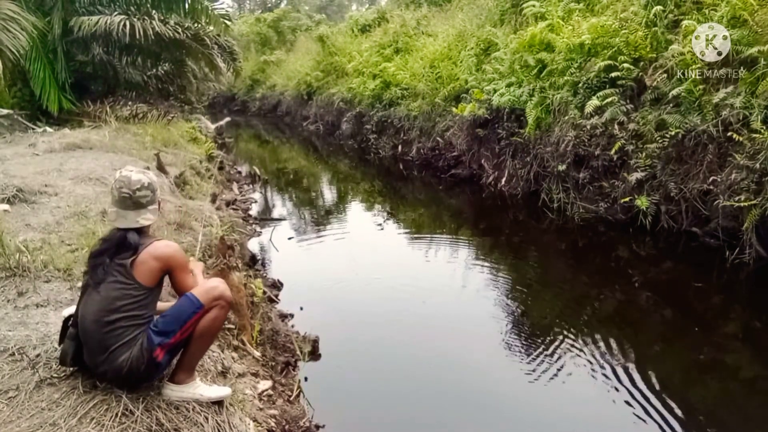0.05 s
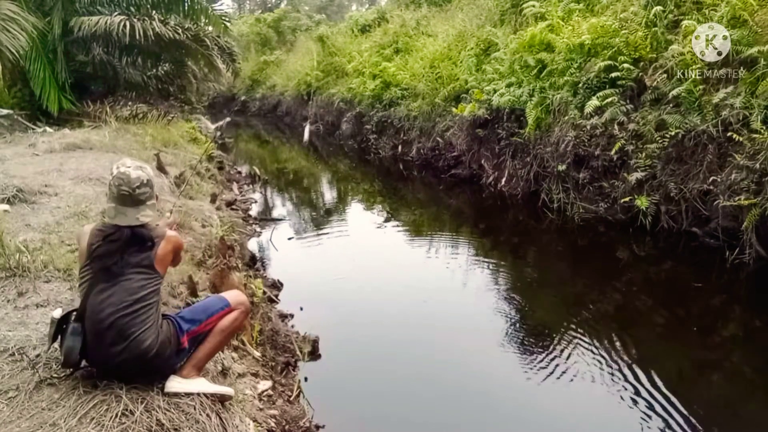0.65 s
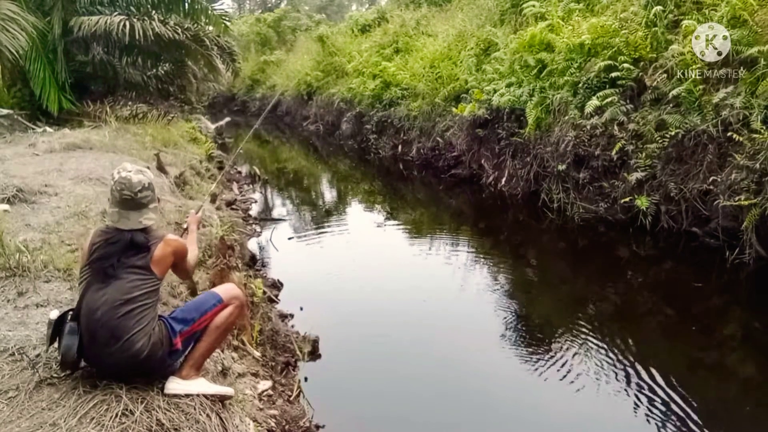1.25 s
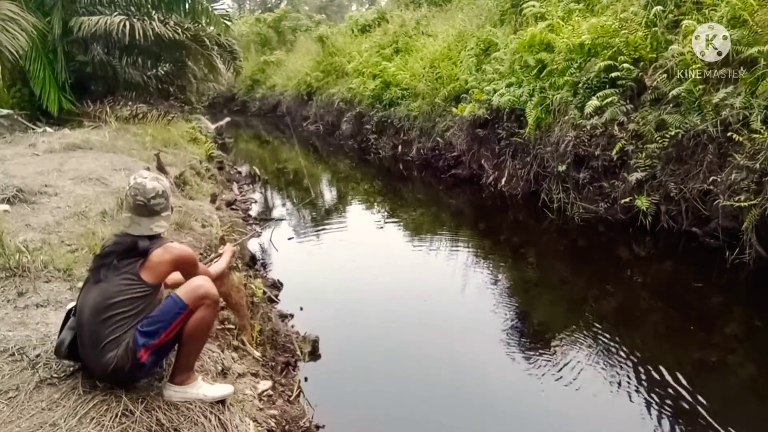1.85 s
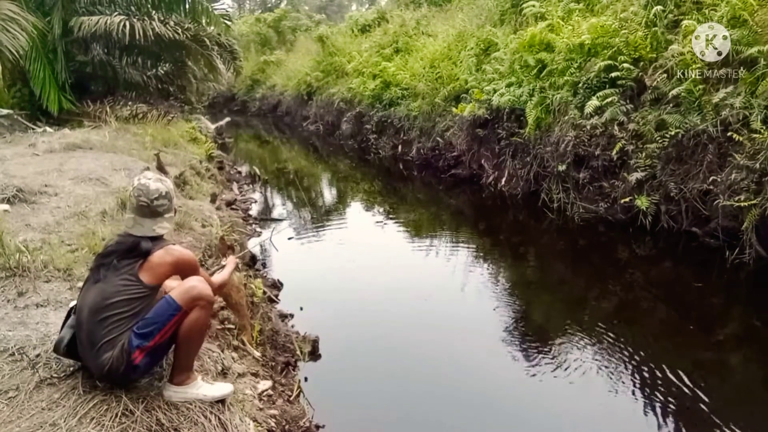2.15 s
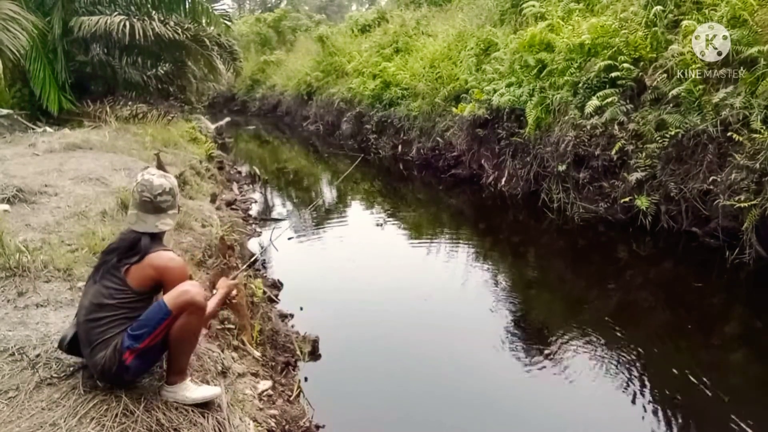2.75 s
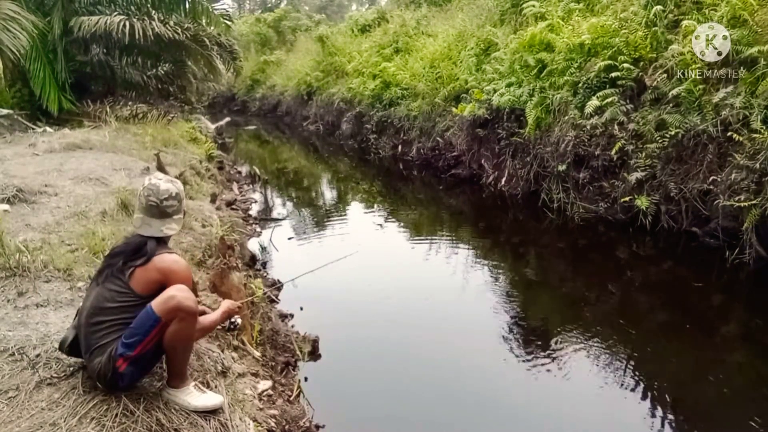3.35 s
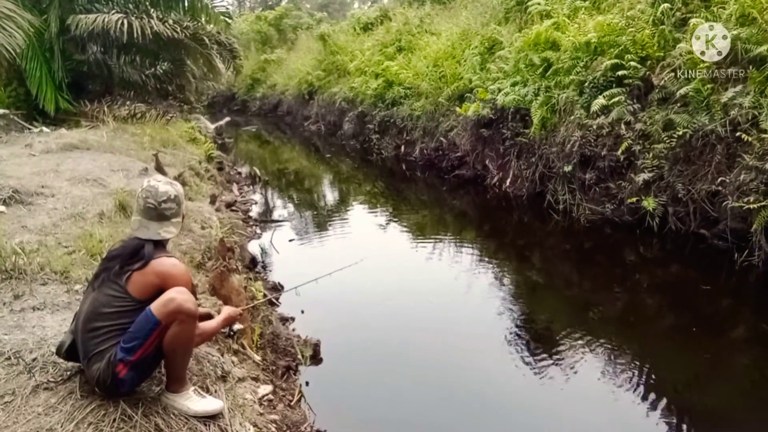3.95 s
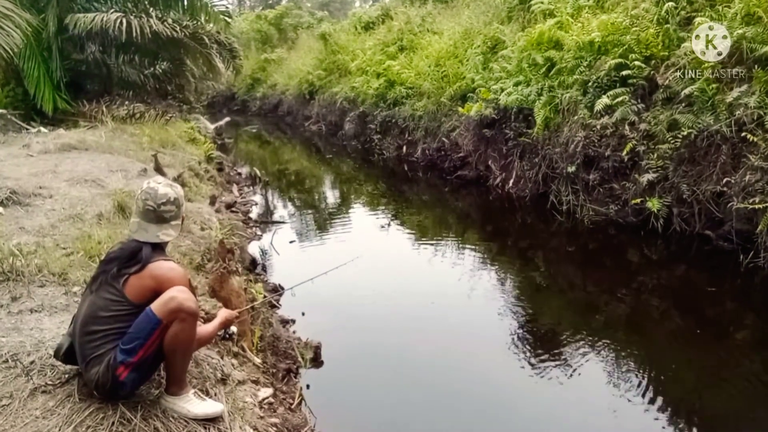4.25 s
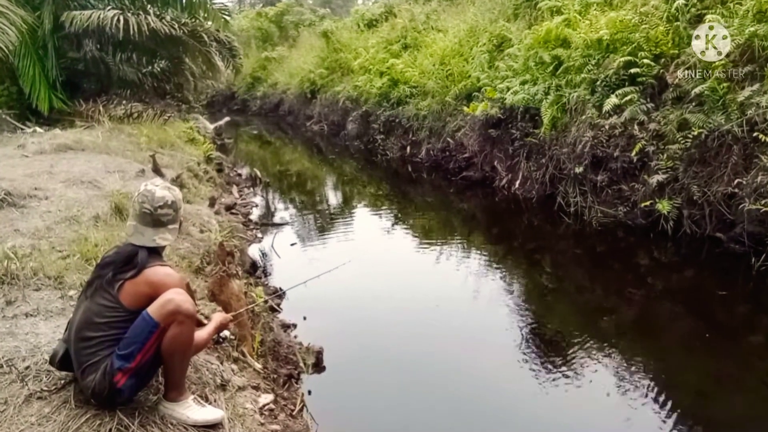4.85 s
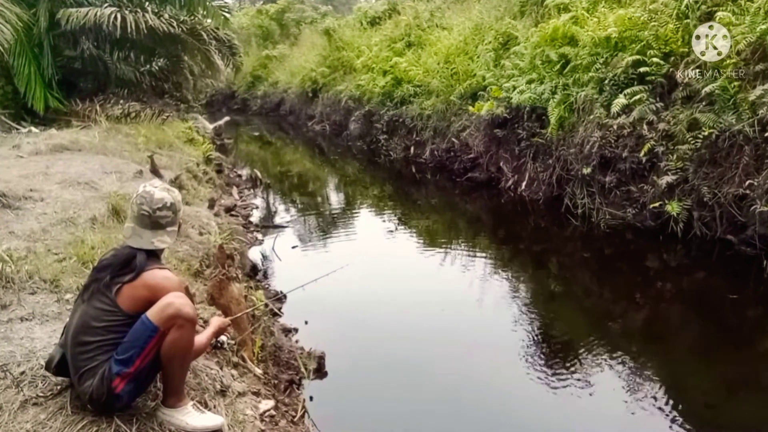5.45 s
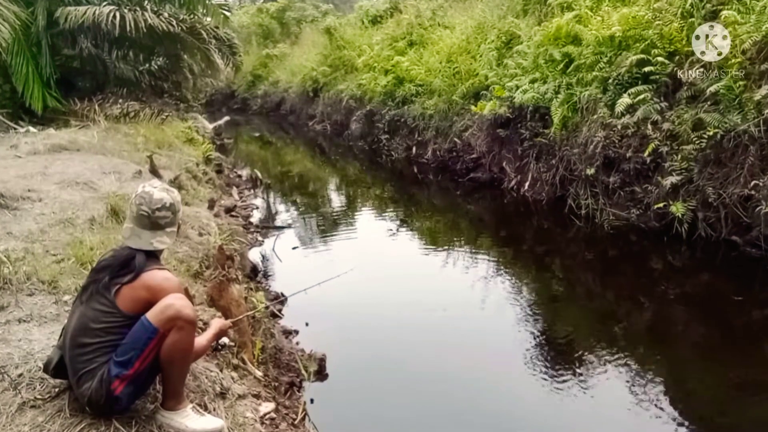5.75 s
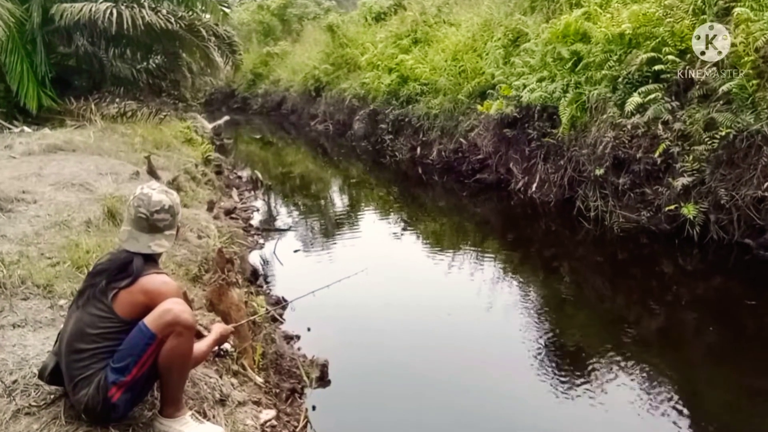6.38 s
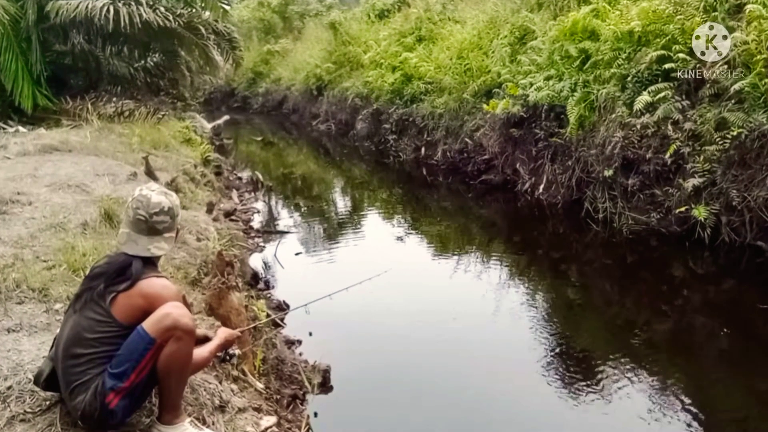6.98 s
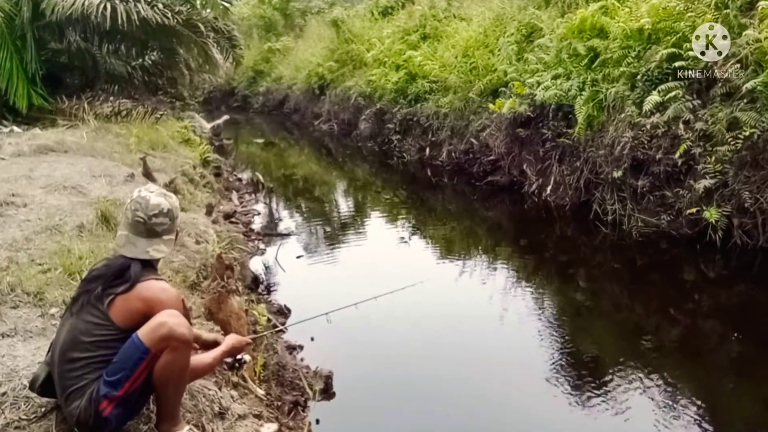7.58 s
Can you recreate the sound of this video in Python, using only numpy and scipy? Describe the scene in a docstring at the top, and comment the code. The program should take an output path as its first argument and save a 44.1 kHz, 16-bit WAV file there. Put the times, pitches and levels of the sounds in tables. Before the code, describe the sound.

Crickets and a chirping bird outdoors, with one sharp rod swish, hissing line, reel clicks and faint distant hooting.

```python
"""Crickets pulse in open air while birds call faintly and one small bird repeats a high arched note.
An angler draws line and casts: the rod swishes at 0.7 s and line hisses off the reel.
The line ticks on the guides, the bail clacks shut at 2.3 s and slack is wound in.
A faint drone sets in, then a rough two-tone hooting comes from far off until 5.6 s.
The crickets and birds carry on, with a few soft low bumps near the end."""
import sys
import numpy as np
from scipy import signal
from scipy.fft import rfft, irfft, next_fast_len
from scipy.io import wavfile
from scipy.ndimage import uniform_filter1d

SR = 44100
rng = np.random.default_rng(int(sys.argv[2]) if len(sys.argv) > 2 else 0)


def materialize(psi):
    """Save the field psi as 16-bit PCM at rate SR to the path in sys.argv[1].

    A 1-D psi becomes a single channel; in a 2-D psi each row is a channel.
    """
    bounded = np.clip(np.atleast_2d(psi).T, -1, 1)
    quanta = np.round(bounded * 32767).astype(np.int16)
    wavfile.write(sys.argv[1], SR, quanta)


N = 336042
TIME = np.arange(N) / SR


def amp(db):
    """Decibels to gain."""
    return 10 ** (np.asarray(db) / 20)


def unit(x):
    """Scale to rms 1."""
    return x / np.sqrt(np.mean(abs(x) ** 2) + 1e-20)


def add(mix, s, sound):
    """Mix a sound in at s seconds."""
    part = mix[max(round(s * SR), 0):][:len(sound)]
    part += sound[:len(part)]


def envelope(s, hold_s, attack_s, release_s):
    """Gain 1 from s for hold_s; 20 dB of rise per attack_s before, 20 dB of fall per release_s after."""
    outside = np.maximum((s - TIME) / attack_s, (TIME - s - hold_s) / release_s)
    return amp(-20 * np.clip(outside, 0, 10))


def noise():
    """White noise, rms 1."""
    return rng.standard_normal(N)


def drift(hz):
    """Random wander, rms 1, with a bandwidth of about hz."""
    t = np.linspace(0, N / SR, 8192)
    lowpass = np.exp(-.5 * (np.fft.rfftfreq(len(t), t[1]) / hz) ** 2)
    return np.interp(TIME, t, unit(irfft(rfft(rng.standard_normal(len(t))) * lowpass)))


def grains(per_s, spread_db):
    """Dense tiny impacts of uneven size."""
    size = amp(spread_db * np.minimum(rng.exponential(1, N), 4))
    return unit(noise() * size * (rng.random(N) < per_s / SR))


def fuzzy_tone(hz, width_hz, rough, wander_hz=9):
    """Tone with the share `rough` of its power scattered into a narrow band."""
    phase = 2 * np.pi * np.cumsum(hz + wander_hz * drift(5.97)) / SR
    steady, scattered = np.sqrt(1 - rough), np.sqrt(rough / 2)
    in_phase = (steady + scattered * drift(width_hz)) * np.cos(phase)
    return unit(in_phase + scattered * drift(width_hz) * np.sin(phase))


def patchy(x, depth_db):
    """Narrow bands swell and fade for a few tens of milliseconds each."""
    bands = signal.stft(x, nperseg=512)[2]
    field = rng.standard_normal(bands.shape)
    for _ in range(2):
        field = uniform_filter1d(uniform_filter1d(field, size=3, axis=0), size=6, axis=1)
    return unit(signal.istft(bands * amp(depth_db * unit(field)), nperseg=512)[1][:N])


def response_db(freqs, spectrum, skirt_db_per_oct):
    """Interpolate a (Hz, dB) spectrum over octaves, rolling off beyond its ends."""
    hz, db = np.transpose(spectrum)
    octave, known = np.log2(freqs + 1), np.log2(hz)
    beyond = abs(octave - np.clip(octave, known[0], known[-1]))
    return np.interp(octave, known, db) - skirt_db_per_oct * beyond


def colour(x, spectrum):
    """Zero-phase filter; output rms 1."""
    size = next_fast_len(N, True)
    gain = amp(response_db(np.fft.rfftfreq(size, 1 / SR), spectrum, skirt_db_per_oct=42))
    return unit(irfft(rfft(x, size) * gain, size)[:N])


def ring(x, spectrum):
    """Strike a minimum-phase body with x."""
    db = response_db(abs(np.fft.fftfreq(4096, 1 / SR)), spectrum, skirt_db_per_oct=24)
    log_gain = np.log(amp(np.maximum(db, -70)))
    body = np.fft.ifft(np.exp(np.conj(signal.hilbert(log_gain)))).real
    return signal.oaconvolve(x, body / np.linalg.norm(body))[:N]


def echo(x, db, t60_s):
    """Sparse, fading reflections, without the direct sound."""
    t = np.arange(SR) / SR
    taps = rng.standard_normal(SR) * (rng.random(SR) < .1) * (t > .003) * amp(-60 * t / t60_s)
    return amp(db) * signal.fftconvolve(x, taps / np.linalg.norm(taps))[:N]


# open air (frequency [Hz], level [dB])
AIR_SPECTRUM = [(20, -17), (60, -3.5), (120, 2.5), (260, -1), (440, -0.5), (660, -3.5), (1000, -8),
                (1350, 4), (2100, -10.5), (3200, -8), (4100, -15), (5600, -6.5), (11000, -21.5),
                (15500, -14.5)]


def air():
    """A faint wash from the open land."""
    return amp(-67) * colour(patchy(noise(), depth_db=2.5), AIR_SPECTRUM)


# far insects (frequency [Hz], level [dB])
CHORUS_SPECTRUM = [(6650, -62), (6970, -6.5), (7350, -1.5), (7900, -3.5), (8380, -2.5), (8480, -9),
                   (9200, -5.5), (10000, -9.5), (10550, -17), (10700, -25)]
# chorus loudness (time [s], level [dB])
CHORUS_CURVE = [(0, -59), (2.1, -59), (3.3, -62), (4.5, -62.5), (5.5, -63.5), (6.5, -62.5), (7.6, -61)]


def insect_chorus(flutter_db=.4):
    """Far crickets blend into a hiss."""
    hiss = colour(patchy(noise(), depth_db=.5), CHORUS_SPECTRUM)
    return hiss * amp(np.interp(TIME, *np.transpose(CHORUS_CURVE)) + flutter_db * drift(40))


# near crickets (pitch [Hz], pulse rate [Hz], time of one pulse [s], level [dB], depth [0-1], width [Hz])
CRICKET_TONES = [(8105, 16.8, 4.703, -65.5, .9, 16), (8355, 16.8, 4.71, -73, .6, 30),
                 (7815, 17.1, 5.03, -67, .55, 24), (7970, 21.5, 5.24, -72, .6, 24),
                 (7010, 24, 4.8, -68, .55, 60)]
# neighbouring cricket's bouts (time [s], length [s])
CRICKET_BOUTS = [(3.63, 0.48), (4.276, 0.35), (4.935, 0.31), (5.655, 0.26), (6.273, 0.22)]


def crickets(fade_db_per_s=.45, rest_db=-19, bout_db=2.5, lift_hz=30, swell_db=1):
    """Pulsing tones that lift in pitch on each pulse; the nearest eases off, its neighbour has bouts."""
    nearest_db = 1.2 - fade_db_per_s * TIME
    singing = np.max([envelope(s, length, .057, .057) for s, length in CRICKET_BOUTS], axis=0)
    neighbour_db = rest_db + (bout_db - rest_db) * singing
    efforts_db = [nearest_db, nearest_db, neighbour_db, 0, 0]  # the nearest rings on two pitches
    out = np.zeros(N)
    for (hz, pulse_hz, s, db, depth, width_hz), effort_db in zip(CRICKET_TONES, efforts_db):
        cycle = 2 * np.pi * pulse_hz * (TIME - s)
        stroke = (.5 + .5 * np.cos(cycle)) ** 3
        pulsing = unit(1 + depth * (stroke - 1))
        tone = fuzzy_tone(hz + lift_hz * np.sin(cycle), width_hz, rough=.4)
        out += amp(db + effort_db + swell_db * drift(.38)) * pulsing * tone
    return out


# bird calls (time [s], length [s], start pitch [Hz], middle pitch [Hz], end pitch [Hz], level [dB])
BUSH_CALLS = [(0.005, 0.027, 1415, 1488, 1420, -61), (0.902, 0.035, 1464, 1944, 1450, -49.5),
              (0.903, 0.052, 1602, 1633, 1660, -50), (1.031, .04, 1600, 1500, 1460, -62.5),
              (1.19, 0.042, 1745, 1992, 1860, -50.5), (1.23, 0.025, 1460, 1635, 1600, -50.5),
              (2.723, 0.024, 1140, 1116, 1090, -56.5), (2.796, 0.033, 1710, 1550, 1380, -60),
              (3.555, 0.013, 1180, 1140, 1040, -63), (3.608, 0.012, 2410, 2570, 2600, -69),
              (4.57, 0.0066, 3180, 3210, 2480, -53.5), (4.791, 0.019, 3400, 3223, 3050, -67.5),
              (4.914, 0.016, 3360, 3230, 3140, -69), (5.166, 0.04, 6290, 6500, 6440, -67),
              (5.168, 0.019, 5170, 5290, 4800, -61), (5.7, 0.019, 1250, 1290, 1290, -65.5),
              (6.263, 0.032, 1930, 1835, 1590, -64), (6.311, 0.074, 1695, 1643, 1640, -74),
              (7.021, 0.007, 4100, 3260, 2660, -58), (7.51, 0.02, 3200, 3070, 3100, -70),
              (7.557, 0.02, 3470, 3670, 3720, -70)]


def bush_birds(waver=.029):
    """Short, slightly hoarse whistles from deep in the bushes."""
    out, wobble = np.zeros(N), 1 + waver * drift(185)
    for s, length, *pitches_hz, db in BUSH_CALLS:
        u = np.linspace(-1, 1, int(length * SR))
        hz = np.polyval(np.polyfit([-1, 0, 1], pitches_hz, 2), u)
        hz *= np.interp(s + length * (u + 1) / 2, TIME, wobble)
        note = signal.windows.tukey(len(u), .6) * np.sin(2 * np.pi * np.cumsum(hz) / SR)
        add(out, s, amp(db) * unit(note))
    return out + echo(out, db=-2, t60_s=.14) + echo(out, db=-11, t60_s=.4)


def far_twitter(per_s=14, softest_db=-78):
    """Distant falling peeps, blurred by the bushes."""
    out = np.zeros(N)
    for when, pitch, glide, size, length in rng.random((int(per_s * N / SR), 5)):
        u = np.linspace(-1, 1, int((.005 + .01 * length) * SR))
        hz = (2600 + 1300 * pitch) * (1 - .25 * glide * u)
        peep = np.hanning(len(u)) * np.sin(2 * np.pi * np.cumsum(hz) / SR)
        add(out, when * N / SR, amp(softest_db) * (1 + size) * unit(peep))
    return echo(out, db=0, t60_s=.25)


# hand draws line or turns the reel (time [s], length [s], rub [dB], fizz [dB], rattle [dB])
HAND_STROKES = [(0.03, 0.12, -60.5, -75, -99), (0.2, 0.21, -55.5, -69, -72),
                (0.466, 0.085, -63.5, -74, -63.5), (1.65, 0.062, -63, -82, -77),
                (1.833, 0.048, -68, -70, -84), (2.296, 0.024, -51, -68, -68), (2.39, 0.15, -57, -70, -73.5),
                (2.6, 0.048, -49, -61, -81), (2.708, 0.047, -53, -74, -56.5),
                (2.797, 0.052, -49.5, -61, -77), (2.912, 0.16, -58.5, -76, -73.5),
                (3.127, 0.13, -63.5, -83, -92)]
# line let go, then stopped by the bail (time [s], level [dB])
LINE_JERKS = [(.722, -40), (2.282, -52)]
# line over the spool lip (frequency [Hz], level [dB])
FIZZ_SPECTRUM = [(10000, -10), (11200, -3), (11800, -14), (13000, -2), (14000, 1), (14700, 14),
                 (15500, 7.5)]
# taut line exciting the rod's resonances (frequency [Hz], level [dB])
SCRAPE_SPECTRUM = [(2700, -26), (3200, -5), (4200, -14), (5050, 4.5), (5350, 7), (5750, 7), (6300, 2.5)]
# line through the guides (frequency [Hz], level [dB])
RUB_SPECTRUM = [(90, -14), (250, -13), (450, -22), (1500, -10), (2200, -24.5), (3200, -16.5), (4300, -25),
                (5200, -10.5), (6100, -6), (7000, 4.5), (8000, -2), (9500, -9.5), (11000, -18.5),
                (13000, -60)]
# reel turning in its housing (frequency [Hz], level [dB])
RATTLE_SPECTRUM = [(180, -24), (250, 19), (400, -51), (800, -9), (1150, -10), (1550, 9), (2100, -12.5),
                   (2800, 4.5), (3500, 10.5), (4300, -6)]


def fishing_line(let_go_s=.72, flight_s=.615, flight_db=-51, growth_db_per_s=8):
    """Hand strokes rub the line and rattle the reel; in flight the line hisses off the spool."""
    gates = [envelope(s, length, attack_s=.05, release_s=.095) for s, length, *_ in HAND_STROKES]
    hand_rub, hand_fizz, hand_rattle = amp(np.transpose(HAND_STROKES)[2:]) @ gates
    jerks = sum(amp(db) * envelope(s, .004, attack_s=.006, release_s=.04) for s, db in LINE_JERKS)
    fizz_db = flight_db + growth_db_per_s * np.clip(TIME - let_go_s, 0, flight_s)
    flight_fizz = amp(fizz_db) * envelope(let_go_s, flight_s, attack_s=.025, release_s=.18)
    flight_rub = amp(flight_db) * envelope(let_go_s, flight_s, attack_s=.26, release_s=.66)
    fizz = amp(.3 * drift(40)) * colour(patchy(noise(), depth_db=4), FIZZ_SPECTRUM)
    scrape = amp(-8) * colour(patchy(noise(), depth_db=4.5), SCRAPE_SPECTRUM)
    rub = colour(patchy(grains(per_s=5900, spread_db=0), depth_db=2), RUB_SPECTRUM)
    rattle = colour(patchy(grains(per_s=1500, spread_db=1.5), depth_db=10), RATTLE_SPECTRUM)
    return ((hand_fizz + jerks + flight_fizz) * fizz + hand_rub * scrape
            + (hand_rub + flight_rub) * rub + hand_rattle * rattle)


# arched notes (time of top [s], top pitch [Hz], level [dB], rise [s], fall [s])
ARCHED_NOTES = [(0.263, 4910, -56, 0.039, 0.042), (1.476, 4765, -48.5, 0.037, 0.024),
                (1.967, 4674, -54.5, 0.07, 0.017), (2.418, 4920, -51.5, 0.062, 0.044),
                (2.878, 4597, -51.5, 0.054, 0.051), (3.365, 5030, -48, 0.05, 0.04),
                (3.856, 4764, -52.5, 0.057, 0.045), (4.318, 4782, -50, .058, 0.052),
                (5.697, 4820, -59, 0.05, 0.015), (6.093, 4750, -59.5, 0.056, 0.046),
                (6.523, 5130, -47.5, 0.046, 0.033), (6.928, 4650, -54.5, 0.051, 0.026),
                (7.338, 5080, -42.5, 0.044, 0.048)]


def small_bird(climb=.235, drop=.3, drop_s=.045, corner=.417, ends_db=-29, waver=.012, bank_s=.085):
    """A pure whistle slides up, rounds a corner and falls; its loud top lingers among the trees."""
    direct, tops, wobble = np.zeros(N), np.zeros(N), 1 + waver * drift(140)
    for s, top_hz, db, rise, fall in ARCHED_NOTES:
        t = np.arange(-rise, fall, 1 / SR)
        u = np.where(t < 0, t / rise, [t / fall, t / drop_s])  # pitch drops at one pace in all notes
        fade, bend = (np.hypot(u, corner) - corner) / (np.hypot(1, corner) - corner)
        hz = top_hz * (1 - np.where(t < 0, climb, drop) * bend) * np.interp(s + t, TIME, wobble)
        gain = amp(db + ends_db * fade ** 1.62) * signal.windows.tukey(len(t), .12)
        note = np.sqrt(2) * gain * np.sin(2 * np.pi * np.cumsum(hz) / SR)
        add(direct, s - rise, note)
        add(tops, s - rise, note * amp(-22 * bend))
    leaves = echo(direct, db=-1, t60_s=.16)
    trees = echo(tops, db=-11, t60_s=.45)
    far_bank = np.zeros(N)
    add(far_bank, bank_s, echo(tops, db=-14, t60_s=.45))
    return amp(2) * direct + leaves + trees + far_bank


# rod lifted back, whipped forward, rebounding (time [s], relative speed [dB])
SWING = [(.25, -55), (.47, -28), (.53, -39), (.62, -57), (.66, -19), (.7, -11.5), (.72, 3), (.745, -5),
         (.775, -5), (.83, -17), (.88, -13), (.95, -29.5)]
# rod's high whistle (frequency [Hz], level [dB])
WHISTLE_SPECTRUM = [(4200, -29), (4950, 4), (5300, -1), (5800, 5.5), (6300, -3), (6800, 2.5), (7500, -2),
                    (8600, -9), (11000, -12), (13000, -19), (15300, -27)]
# rod's lower rush (frequency [Hz], level [dB])
RUSH_SPECTRUM = [(130, -15), (300, -16), (520, -4.5), (750, -8), (1100, -13), (1500, 6.5), (2100, -3.5),
                 (2600, 3), (3150, 6.5), (4000, -2.5), (4800, 2.5)]
# thick butt's hollow whoosh (frequency [Hz], level [dB])
WHOOSH_SPECTRUM = [(400, -17), (520, 1), (680, -14), (950, 5), (1200, 4.5), (1500, 2), (1800, -17)]


def rod_swish():
    """The rod sheds eddies: whistle and rush grow with its speed, the whoosh comes as it slows."""
    speed = amp(np.interp(TIME, *np.transpose(SWING), left=-120, right=-120))
    slowing = envelope(.749, hold_s=.026, attack_s=.084, release_s=.053)
    whistle = amp(-31) * speed ** .84 * colour(patchy(noise(), depth_db=2), WHISTLE_SPECTRUM)
    rush = amp(-35) * speed ** 1.09 * colour(patchy(noise(), depth_db=4.5), RUSH_SPECTRUM)
    whoosh = amp(-43) * slowing * colour(patchy(noise(), depth_db=3), WHOOSH_SPECTRUM)
    return whistle + rush + whoosh


# reel and tackle clicks (time [s], snap [dB], knock [dB], t60 [s])
REEL_CLICKS = [(0.7325, -18.5, -31, 0.011), (0.7313, -27, -40, 0.029), (2.236, -50.5, -48.5, 0.45),
               (2.2519, -37.5, -36, 0.026), (2.262, -45, -43.5, 0.041), (2.283, -20, -47, 0.0078),
               (2.286, -47.5, -51.5, 0.34), (2.349, -41, -43, 0.1), (5.946, -76, -65, 0.03),
               (6.58, -74, -61, 0.05), (7.499, -57, -66, 0.044)]
# bright snap (frequency [Hz], level [dB])
SNAP_SPECTRUM = [(2000, -51), (3200, 9.5), (4300, -23), (5500, 13.5), (7000, 9), (8500, 3.5), (11000, -4),
                 (13000, -5), (15500, -6)]
# dull knock of the housing (frequency [Hz], level [dB])
KNOCK_SPECTRUM = [(180, -12), (350, -11), (620, -8), (950, -4), (1550, 14.5), (2200, 6), (3100, 11),
                  (4200, -11), (6000, -33.5)]


def reel_clicks():
    """Bursts of chatter ring as a bright snap and a dull knock of the housing."""
    snaps, knocks, t = np.zeros(N), np.zeros(N), np.arange(SR // 5) / SR
    for s, snap_db, knock_db, t60_s in REEL_CLICKS:
        chatter = rng.choice([-1., 1.], len(t)) * amp(-60 * t / t60_s)
        add(snaps, s, amp(snap_db) * chatter)
        add(knocks, s, amp(knock_db) * chatter)
    out = ring(snaps, SNAP_SPECTRUM) + ring(knocks, KNOCK_SPECTRUM)
    return out + echo(out, db=-9.5, t60_s=.12) + echo(out, db=-16, t60_s=.86)


# line hitting the guides (time [s], level [dB])
GUIDE_FLICKS = [(1.656, -34), (1.856, -39), (1.8894, -28.5), (2.469, -33.5), (2.612, -34), (2.721, -34),
                (2.841, -28), (2.971, -33), (2.996, -29), (3.037, -29), (3.3012, -38), (4.341, -40),
                (4.4168, -34.5), (4.516, -41), (5.167, -37)]
# guide ring (frequency [Hz], level [dB])
GUIDE_SPECTRUM = [(3500, -25), (5200, 2), (6300, 6.5), (7500, 15.5), (8800, 1), (10500, -1), (13000, -28),
                  (15500, -18)]


def guide_ticks():
    """The line flicks a small hard ring: a sharp tick and a short shiver of the rod."""
    flicks = np.zeros(N)
    for s, db in GUIDE_FLICKS:
        add(flicks, s, [2 * amp(db)])
    ticks = ring(flicks, GUIDE_SPECTRUM)
    return ticks + echo(ticks, db=-3, t60_s=.012)


# bail impacts (time [s], level [dB])
BAIL_CLUNKS = [(2.298, -59), (2.352, -49.5)]
# bail resonances (frequency [Hz], level [dB])
BAIL_SPECTRUM = [(300, -12), (420, 6), (520, -4), (640, 13), (760, 1), (900, 9), (1100, -30)]


def bail():
    """The bail rings low as it shuts and seats."""
    gain = sum(amp(db) * envelope(s, .0059, attack_s=.019, release_s=.061) for s, db in BAIL_CLUNKS)
    return gain * colour(noise(), BAIL_SPECTRUM)


# far drone (frequency [Hz], level [dB])
DRONE_SPECTRUM = [(250, -9), (330, -11), (440, 4), (620, -11), (850, -1.5), (1050, -8.5)]


def far_drone(start_s=2.31):
    """A faint band of noise sets in and stays."""
    gain = amp(-71) * envelope(start_s, N / SR, attack_s=.47, release_s=1)
    return gain * colour(noise(), DRONE_SPECTRUM)


# hoots (time [s], length [s], low tone pitch [Hz], low tone level [dB], high tone level [dB])
FAR_HOOTS = [(2.846, 0.044, 589, -67, -61), (2.901, .03, 593, -64, -84), (2.95, 0.0505, 439.4, -66, -82),
             (3.033, 0.055, 452, -62.5, -63.5), (3.128, .09, 532, -64, -68), (3.301, 0.11, 450, -59, -60.5),
             (3.451, 0.077, 462.5, -56.5, -68), (3.559, 0.067, 520, -67, -58.5),
             (3.649, .055, 451, -57, -63.5), (3.769, 0.03, 433, -61, -59), (3.867, 0.13, 417, -57.5, -63.5),
             (4.095, 0.224, 422, -59.5, -66), (4.361, 0.11, 422, -61, -76), (4.543, 0.15, 420, -59, -62),
             (4.875, 0.19, 425, -61, -59), (5.14, 0.059, 418, -63.5, -66), (5.2, 0.36, 420, -81, -62)]


def hooting(flutter_db=1.66, flutter_hz=11, pulse_hz=44, pulse_depth=.22):
    """Two rough, fluttering tones come in stretches, blurred by distance."""
    gates = [envelope(s, length, attack_s=.03, release_s=.073) for s, length, *_ in FAR_HOOTS]
    start, length, low_hz, low_db, high_db = np.transpose(FAR_HOOTS)
    low = fuzzy_tone(np.interp(TIME, start + length / 2, low_hz), width_hz=55, rough=.72)
    high = fuzzy_tone(hz=796, width_hz=33.5, rough=.81)
    low *= amp(-1 + flutter_db * drift(flutter_hz)) * (amp(low_db) @ gates)
    high *= amp(flutter_db * drift(flutter_hz)) * (amp(high_db) @ gates)
    cycles = np.cumsum(pulse_hz * (1 + .1186 * drift(8.22))) / SR
    return (low + high) * unit(1 + pulse_depth * np.cos(2 * np.pi * cycles))


# soft bumps (time [s], level [dB])
LOW_BUMPS = [(6.72, -76), (6.96, -68), (7.115, -65)]


def low_bumps():
    """Brief swells of low rumble."""
    gain = sum(amp(db) * envelope(s, .03, attack_s=.074, release_s=.059) for s, db in LOW_BUMPS)
    return gain * colour(noise(), [(30, -5), (70, 5), (130, -2.5)])


def scene():
    """Everything at one microphone on the ditch bank."""
    out = air() + insect_chorus() + crickets() + bush_birds() + far_twitter()
    out += fishing_line() + small_bird() + rod_swish() + reel_clicks() + guide_ticks() + bail()
    out += far_drone() + hooting() + low_bumps()
    return out[None]


def record(dry):
    """Band limit at 15.6 kHz."""
    lowpass = signal.firwin(801, 15600, window=("kaiser", 8), fs=SR)
    return signal.oaconvolve(dry, lowpass[None], "same")


dry = scene()
out = record(dry)
materialize(out)
```